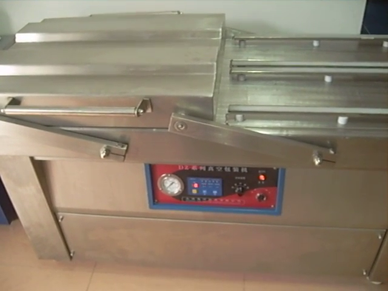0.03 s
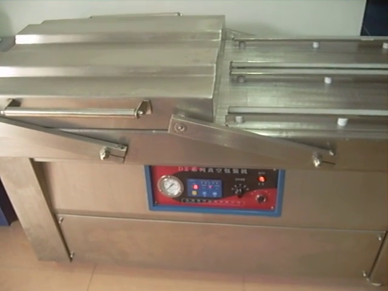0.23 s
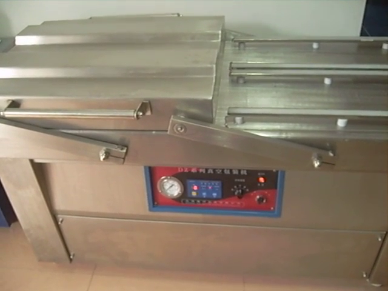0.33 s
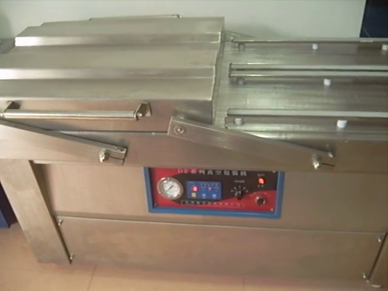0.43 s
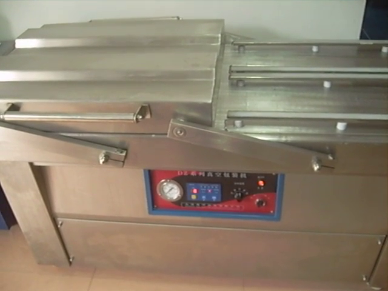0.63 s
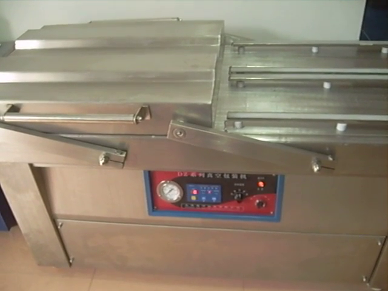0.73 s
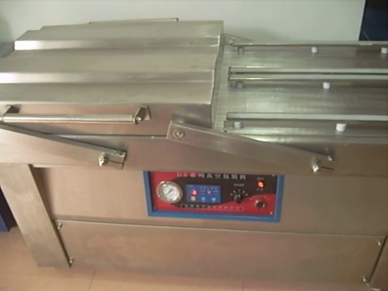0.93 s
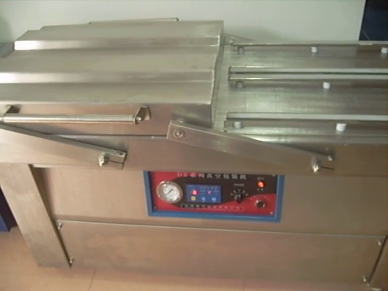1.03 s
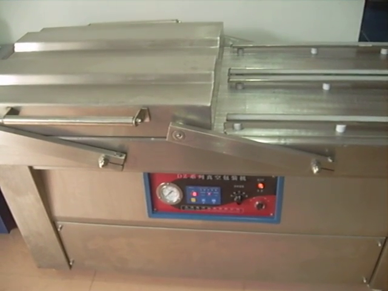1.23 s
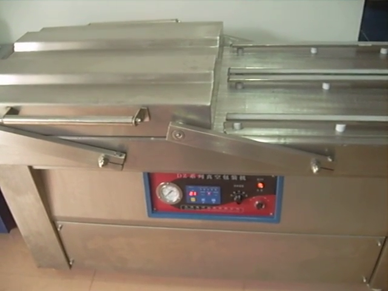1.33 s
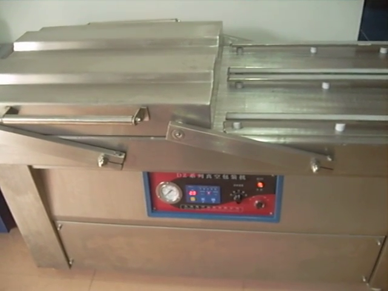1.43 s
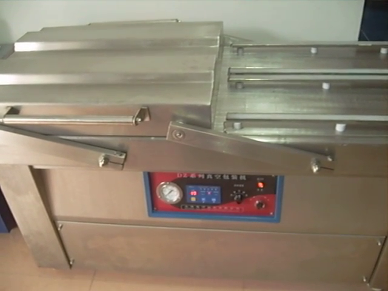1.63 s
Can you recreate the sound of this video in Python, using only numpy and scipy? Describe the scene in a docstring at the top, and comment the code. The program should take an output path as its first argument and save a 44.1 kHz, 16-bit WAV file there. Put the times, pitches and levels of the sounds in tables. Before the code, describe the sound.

After a moment of faint machine hum, a burst of air rushes out harshly, rattling metal panels, then thins away before a soft double lid thump, in a reflective room through a small, ringing microphone.

```python
"""In a small hard room, a steel vacuum packing machine vents its chamber over a faint hum of sines and noise.
The valve snaps open with chirps, and turbulent air, as filtered noise, hisses and fades as the pressure evens out.
The lid clatters (decaying noise), the panels shudder (resonant noise) and the lid seal flutters (a wavering sine).
A breathy whistle swells late in the hiss; the lid comes free with weak thumps of noise and ringing modes.
Dense reflections surround the air, clatter and thumps; the small microphone rings in the treble."""
import sys
import numpy as np
from scipy import signal
from scipy.fft import rfft, irfft
from scipy.io import wavfile

SR = 44100
rng = np.random.default_rng(int(sys.argv[2]) if len(sys.argv) > 2 else 0)


def to_wav(s):
    """Save 16-bit WAV."""
    ch = np.atleast_2d(s).T  # columns
    pcm = np.round(np.clip(ch, -1, 1) * 32767)  # PCM
    wavfile.write(sys.argv[1], SR, pcm.astype(np.int16))


N = 74970

# Levels are those of each source, ahead of the room and the microphone.
# spectrum of the steady background noise: frequency_hz, relative_density_db
FLOOR_SPECTRUM = [(30, -35), (55, -14), (90, -2), (300, 1.5), (520, -0.5), (830, 2), (1200, -0.5),
                  (2200, -3), (2800, -9.5), (3400, -5), (4200, -12), (5200, -23), (7000, -25.5),
                  (11000, -31)]
# sinusoidal lines of the hum: frequency_hz, rms_level_db
HUM_LINES = [(100, -72.5), (150, -70.5), (305, -78), (829, -70.5), (1642, -71), (2105, -97), (8000, -88)]
# panel resonances: frequency_hz, width_hz, relative_level_db
PANEL_RESONANCES = [(75, 34, -11), (121, 22, -9), (209, 28, -8.5), (280, 57, -3.5), (374, 49, -2),
                    (473, 49, -6.5)]
# shudder of the panels under the surge: time_s, level_db
SHUDDER_LEVEL = [(.2, -77), (.212, -52), (.248, -47), (.265, -32), (.31, -40.5), (.38, -39), (.448, -45),
                 (.465, -44), (.6, -48), (.8, -67), (1., -88)]
# low flutter of the lid seal: time_s, mean_pitch_hz, mean_level_db
SEAL_FLUTTER = [(.203, 260, -68), (0.209, 253.6, -43), (.245, 239.1, -49), (0.281, 215.2, -43.5),
                (.32, 212.4, -38), (.4, 220, -38.5), (0.449, 213, -44.5), (0.463, 216, -58), (.6, 216, -89)]
# thumps of the lid coming free: start_s, level_db, decay_constant_s
LID_THUMPS = [(1.3012, -32, .028), (1.3125, -35, 0.017), (1.357, -47, .004)]
# spectrum of a thump: frequency_hz, relative_density_db
THUMP_SPECTRUM = [(30, -46), (110, -7), (170, -11), (270, 0), (470, -0.5), (600, -5.5), (850, 2),
                  (1300, -3), (1800, 2), (2150, -3), (2380, 4), (2700, -3), (3050, -1.5), (3450, -3.5),
                  (4100, -2), (5200, -6.5), (5900, -17), (7500, -21.5), (11000, -30.5)]
# modes of the lid: frequency_hz, relative_level_db, t60_s
LID_MODES = [(287, -6.5, 0.58), (374, -6, 0.53), (479, -5.5, 0.57), (837, -9, 0.31), (947, -5, 0.22),
             (1200, -12, 0.91), (1627, -8, 0.37), (1870, -7, 0.4), (2340, 9, 0.17), (2520, -6, 0.3),
             (2988, 3, .14), (3165, -19, .22), (3994, -19, .3), (4800, -12.5, .25)]
# clatter under the surge: start_s, level_db, bass_gain_db, crack_decay_constant_s
CLATTER_KNOCKS = [(0.261, -44, 16, 0.012), (0.264, -22, 3.5, 0.008), (0.2736, -27, -2, 0.0082),
                  (0.2822, -25, 6, 0.03), (0.2975, -24.5, 7, 0.0029)]
# spectrum of the clatter: frequency_hz, relative_density_db
KNOCK_SPECTRUM = [(30, -39), (100, -7.5), (170, -5), (280, 0.5), (400, 2.5), (600, -6), (850, -3.5),
                  (1250, -0.5), (1550, 4), (2400, 1), (2800, -4.5), (3400, 0.5), (4300, -5), (5200, -7.5),
                  (6500, -17.5), (11000, -41)]
# spurts as the valve opens and the surge peaks: centre_s, peak_level_db, pitch_hz
AIR_SPURTS = [(0.2059, -20.5, 3720), (0.2096, -25, 3670), (.2252, -23, 3478), (.232, -30, 3450),
              (.267, -20, 3346), (.2755, -23, 3450), (0.2997, -23, 3434)]
# half whistle of the valve: frequency_hz, width_hz, relative_level_db
WHISTLE_RESONANCES = [(3075, 140, -5.5), (3490, 110, 0), (6280, 110, -14)]
# strength of the whistle as the flow slackens: time_s, level_db
WHISTLE_STRENGTH = [(.2, -50), (.86, -52), (.915, -42.5), (.98, -44.5), (1.07, -45.5), (1.13, -50),
                    (1.28, -57), (1.42, -100)]
# thin overtone sliding down as the pressure evens out: time_s, pitch_hz, level_db
OVERTONE_SLIDE = [(.88, 10300, -75), (1.0, 10300, -58), (1.08, 9850, -58.5), (1.16, 9100, -68),
                  (1.28, 8250, -81)]
# air flow through the valve: time_s, level_db
AIR_FLOW = [(.2, -30.5), (.25, -28.5), (.29, -31), (.38, -30), (.5, -31), (.62, -32.5), (.8, -34.5),
            (.95, -36.5), (1.08, -39.5), (1.2, -41.5), (1.3, -47), (1.43, -56.5), (1.56, -69), (1.7, -90)]
# spectrum of the jet: frequency_hz, relative_density_db (at opening), extra_fade_db_per_s
JET_SPECTRUM = [(50, -18, 6), (108, -12, 2.5), (260, -9, 2), (403, -5.5, 20), (654, -8.5, 12.5),
                (1140, -1.5, 26), (1860, -1.5, 3), (2200, -2, 2.5), (2760, -4, 2), (3400, 1, 9),
                (3960, 0.5, 1.5), (4880, 0.5, 4), (5700, -6, -1), (6370, -9, -4.5), (8040, -11.5, 2.5),
                (10190, -11.5, 5), (11220, -33, 1)]
# narrow resonances of the air passage: frequency_hz, width_hz, boost_db
PASSAGE_RESONANCES = [(3185, 25, 4.5), (3257, 70, 3.5), (3390, 43, 5), (3813, 33, 4), (6260, 115, 4),
                      (7100, 90, 0.5), (9100, 250, 1.5), (10100, 150, -1.5)]

FLOOR_DB = -56.5
DRONE_DB, DRONE_HZ, DRONE_WIDTH_HZ = -59, 287, 140
FLUTTER_SPREAD_DB, FLUTTER_PITCH_SPREAD, FLUTTER_WANDER_HZ = 1, 0.03, 48.6  # pitch spread is a fraction
THUMP_RISE_S, THUMP_TAIL_DB, THUMP_T60_S, LID_DB = .0015, -11.5, 0.85, -12.5
THUMP_BODY_HZ, THUMP_BODY_RISE_S = 1400, 0.016  # below this frequency the body swells more slowly
WASH_DB, WASH_T60_S, BASS_HZ = -14, 0.64, 455
SPURT_HALF_WIDTH_S = 0.0011  # from the peak to 1/e
SLIDE_WANDER_HZ = 330
OPEN_S, OPEN_RISE_S = .2025, 0.002
JET_ROUGH_DB, JET_ROUGH_HZ = -0.28, 90
ROOM_DB, ROOM_T60_S, ROOM_TREBLE_T60_S, ROOM_SPLIT_HZ = -6, 0.85, 0.34, 5160
MIC_HZ, MIC_WIDTH_HZ, MIC_DB = 3356, 552, 12
MIC_LOW_HZ, TOP_HZ = 45, 11150


def undb(db):
    """Decibel law: amplitude ratio from a level."""
    return 10 ** (np.asarray(db) / 20)


def unit(x):
    """Normalisation to an rms of 1."""
    return x / np.sqrt(np.mean(x ** 2))


def times():
    """Uniform sampling: time of each sample in seconds."""
    return np.arange(N) / SR


def curve(rows):
    """Envelope by linear interpolation of level: gain from (s, dB) points."""
    return undb(np.interp(times(), *np.array(rows).T))


def filtered(x, response):
    """Linear filtering: the spectrum is multiplied by a function of frequency."""
    f = np.arange(N + 1) * SR / (2 * N) + 1e-3  # the offset keeps log(f) finite
    return irfft(rfft(x, 2 * N) * response(f))[:N]


def resonance(f, hz, width):
    """Simple resonator: band-pass response with gain 1 at the centre."""
    return 1 / (1 + 1j * (f * f - hz * hz) / (f * width))


def along(f, hz, values):
    """Linear interpolation on a log-frequency axis."""
    return np.interp(np.log(f), np.log(hz), values)


def noise(response):
    """Spectral shaping of white noise, brought to rms 1."""
    return unit(filtered(rng.standard_normal(N), response))


def coloured(rows):
    """Broadband noise of rms 1 shaped by (Hz, dB) points."""
    return noise(lambda f: undb(along(f, *np.array(rows).T)))


def resonant(rows):
    """Noise-driven resonance: rms 1 in steep bands (Hz, width Hz, dB)."""
    return noise(lambda f: sum(undb(db) * abs(resonance(f, hz, width)) ** 2 for hz, width, db in rows))


def wobble(hz):
    """Low-pass noise: random wander of rms 1, mostly slower than the given rate."""
    return noise(lambda f: 1 / (1 + (f / hz) ** 2))


def fall(start, length):
    """Exponential decay with time constant length, after a 1 ms rise."""
    age = times() - start
    return np.clip(age / .001, 0, 1) * np.exp(-np.maximum(age, 0) / length)


def ring_down(start, t60):
    """Exponential decay by 60 dB in t60 seconds."""
    return fall(start, t60 / np.log(1000))


def hum():
    """Superposition: steady sines and dull noise, with a cabinet drone once the valve is open."""
    t = times()
    lines = sum(
        np.sqrt(2) * undb(db) * np.sin(2 * np.pi * (hz * t + rng.random()))
        for hz, db in HUM_LINES)
    drone = undb(DRONE_DB) * noise(lambda f: resonance(f, DRONE_HZ, DRONE_WIDTH_HZ))
    drone = drone * np.clip((t - OPEN_S) / .1, 0, 1)
    return lines + drone + undb(FLOOR_DB) * coloured(FLOOR_SPECTRUM)


def shudder():
    """Forced vibration: the first surge shakes the low resonances of the panels."""
    return curve(SHUDDER_LEVEL) * resonant(PANEL_RESONANCES)


def flutter():
    """Frequency and amplitude modulation: the seal's low note is unsteady while the surge is strong."""
    t = times()
    s, hz, db = np.array(SEAL_FLUTTER).T
    pitch = np.interp(t, s, hz) * (1 + FLUTTER_PITCH_SPREAD * wobble(FLUTTER_WANDER_HZ))
    gain = undb(np.interp(t, s, db) + FLUTTER_SPREAD_DB * wobble(FLUTTER_WANDER_HZ))
    return np.sqrt(2) * gain * np.sin(2 * np.pi * np.cumsum(pitch) / SR)


def thumps():
    """Modal decay: the lid lets go with diffuse blows, treble before body, and rings on."""
    t, out = times(), 0
    for s, db, length in LID_THUMPS:
        envelope = fall(s, length) + undb(THUMP_TAIL_DB) * ring_down(s, THUMP_T60_S)
        blow = coloured(THUMP_SPECTRUM) * envelope
        phases = rng.uniform(0, 2 * np.pi, len(LID_MODES))
        ring = sum(
            undb(mode_db) * np.sin(2 * np.pi * hz * t + phase) * ring_down(s, t60)
            for (hz, mode_db, t60), phase in zip(LID_MODES, phases))
        hit = undb(db) * (blow + undb(LID_DB) * ring)
        body = filtered(hit, lambda f: 1 / (1 + (f / THUMP_BODY_HZ) ** 4))
        treble = hit - body
        out = out + treble * np.clip((t - s) / THUMP_RISE_S, 0, 1)
        out = out + body * np.clip((t - s) / THUMP_BODY_RISE_S, 0, 1)
    return out


def knocks():
    """Impact excitation: a short crack, then noise as the dense wash of sheet-steel modes."""
    out = 0
    for s, db, bass_db, length in CLATTER_KNOCKS:
        envelope = fall(s, length) + undb(WASH_DB) * ring_down(s, WASH_T60_S)
        crack = coloured(KNOCK_SPECTRUM) * envelope
        shelved = filtered(crack, lambda f: 1 + (undb(bass_db) - 1) / (1 + 1j * f / BASS_HZ))
        out = out + undb(db) * shelved
    return out


def spurts():
    """Gaussian tone bursts: the valve spits a few shrill chirps in the first rush."""
    t = times()
    out = 0
    for s, db, hz in AIR_SPURTS:
        burst = np.exp(-((t - s) / SPURT_HALF_WIDTH_S) ** 2)
        out = out + undb(db) * burst * np.sin(2 * np.pi * (hz * t + rng.random()))
    return out


def whistle():
    """Narrow-band noise: a breathy whistle swells late, and a thin overtone slides down above it."""
    t = times()
    breath = resonant(WHISTLE_RESONANCES) * curve(WHISTLE_STRENGTH) * (t > OPEN_S)
    s, hz, db = np.array(OVERTONE_SLIDE).T
    tone = np.sin(2 * np.pi * np.cumsum(np.interp(t, s, hz)) / SR)
    thin = np.sqrt(2) * wobble(SLIDE_WANDER_HZ) * tone
    return breath + thin * undb(np.interp(t, s, db)) * (t > s[0]) * (t < s[-1])


def jet():
    """Turbulence noise: rushing air sounds the passage, each band fading at its own rate."""
    hz, db, fade = np.array(JET_SPECTRUM).T

    def passage(f):
        boosts = [1 + (undb(b) - 1) * resonance(f, c, w) for c, w, b in PASSAGE_RESONANCES]
        return undb(along(f, hz, db)) * np.prod(boosts, axis=0)

    air = noise(passage)
    age = np.maximum(times() - OPEN_S, 0)
    # each row of the identity matrix gives one of the overlapping triangular bands
    out = sum(
        filtered(air, lambda f: along(f, hz, band)) * undb(-rate * age)
        for band, rate in zip(np.eye(len(hz)), fade))
    rough = undb(JET_ROUGH_DB * wobble(JET_ROUGH_HZ))
    return out * rough * curve(AIR_FLOW) * np.clip(age / OPEN_RISE_S, 0, 1)


def room(x):
    """Diffuse reverberation: dense reflections whose treble dies first."""
    low = noise(lambda f: 1 / (1 + (f / ROOM_SPLIT_HZ) ** 2)) * ring_down(0.003, ROOM_T60_S)
    high = noise(lambda f: f * f / (f * f + ROOM_SPLIT_HZ ** 2)) * ring_down(0.0055, ROOM_TREBLE_T60_S)
    tail = low + 2 * high
    tail = tail / np.sqrt(np.sum(tail ** 2))
    reflected = undb(ROOM_DB) * signal.fftconvolve(x, tail)[:N]
    return (x + reflected) / np.hypot(1, undb(ROOM_DB))


def scene():
    """Superposition: reverberant air, clatter and thumps over the unreflected shudder, flutter and hum."""
    reverberant = room(jet() + whistle() + spurts() + knocks() + thumps())
    return (reverberant + shudder() + flutter() + hum())[None]


def record(dry):
    """Band-limited transduction: the microphone port rings, deep bass falls away and the top is cut."""
    rung = filtered(dry[0], lambda f: 1 + (undb(MIC_DB) - 1) * resonance(f, MIC_HZ, MIC_WIDTH_HZ))
    thinned = signal.sosfilt(signal.butter(2, MIC_LOW_HZ, "high", fs=SR, output="sos"), rung)
    return signal.sosfilt(signal.ellip(10, .2, 80, TOP_HZ, fs=SR, output="sos"), thinned)[None]


dry = scene()
out = record(dry)
to_wav(out)
```